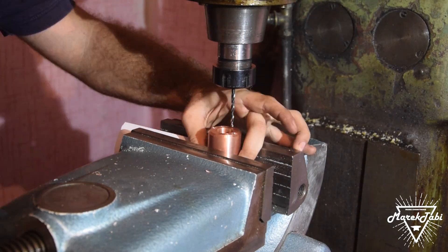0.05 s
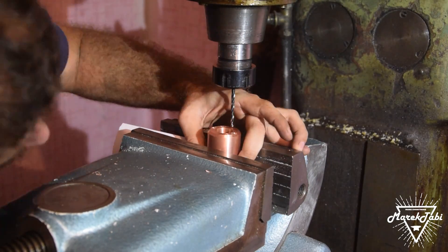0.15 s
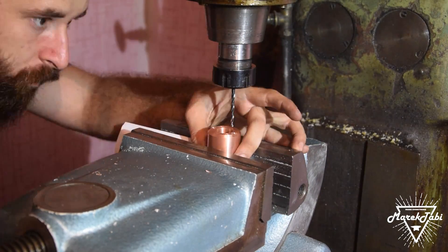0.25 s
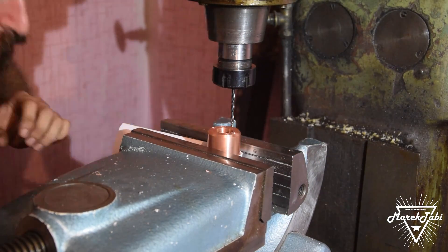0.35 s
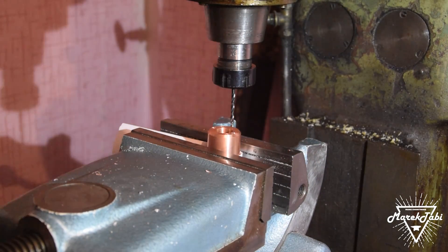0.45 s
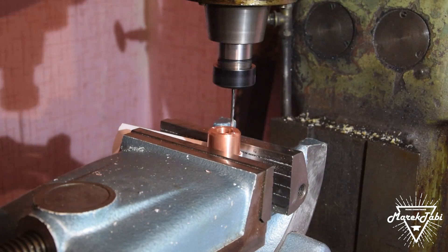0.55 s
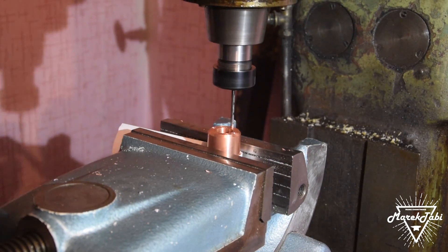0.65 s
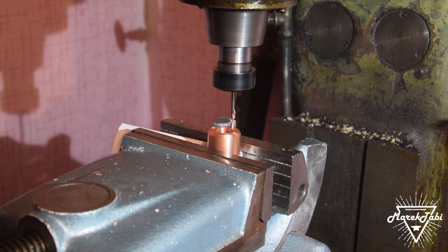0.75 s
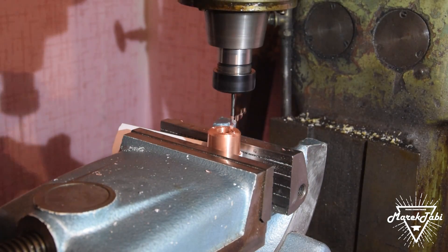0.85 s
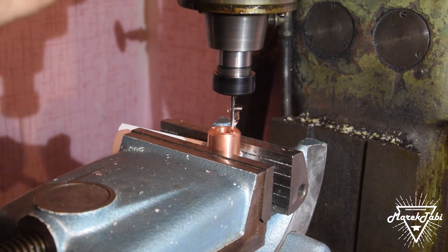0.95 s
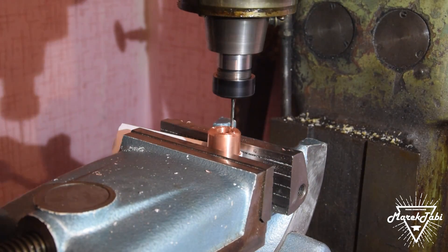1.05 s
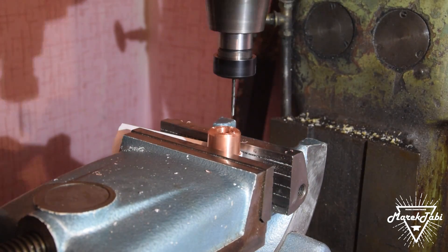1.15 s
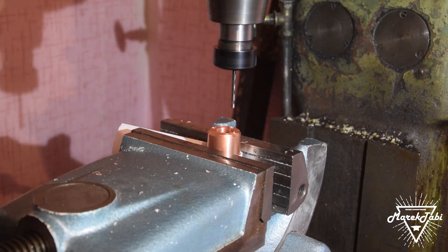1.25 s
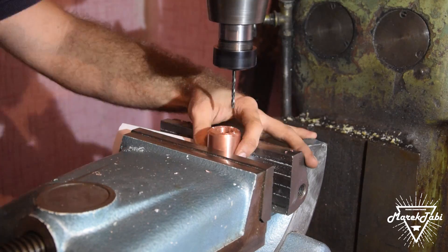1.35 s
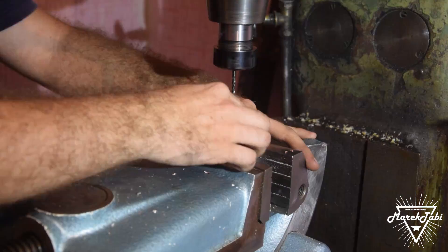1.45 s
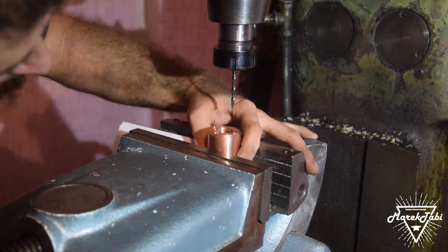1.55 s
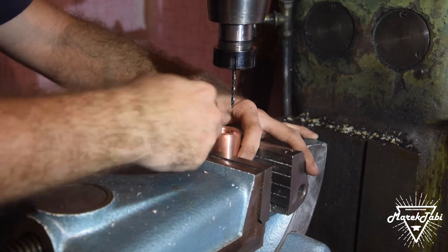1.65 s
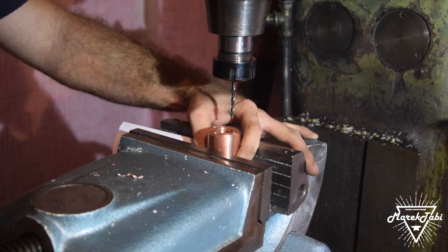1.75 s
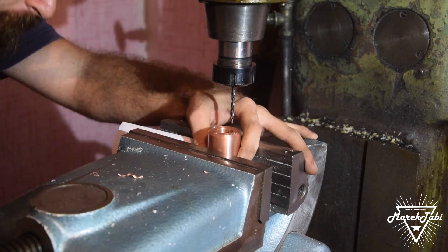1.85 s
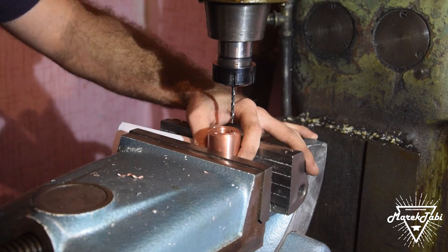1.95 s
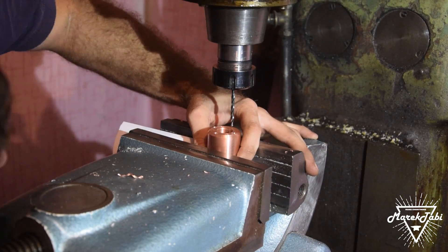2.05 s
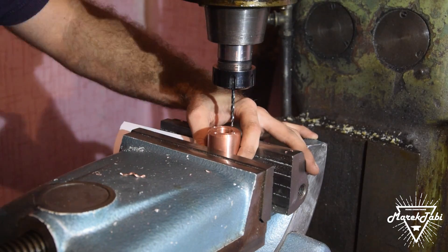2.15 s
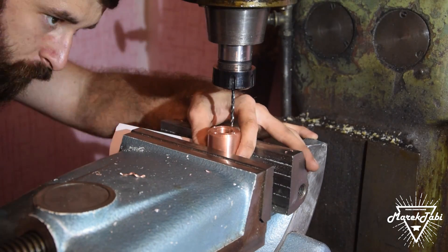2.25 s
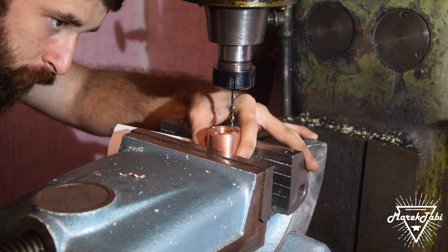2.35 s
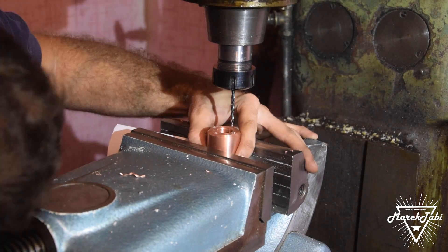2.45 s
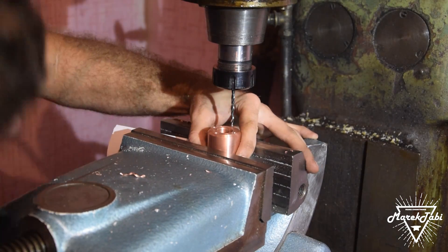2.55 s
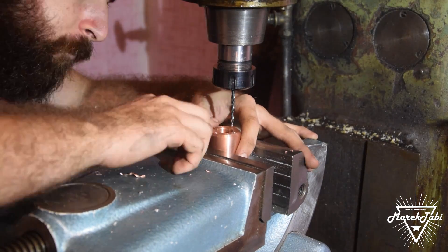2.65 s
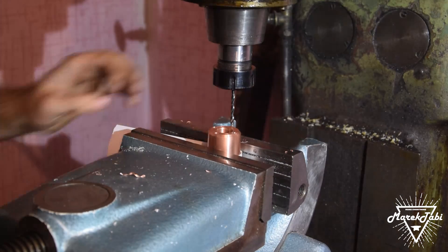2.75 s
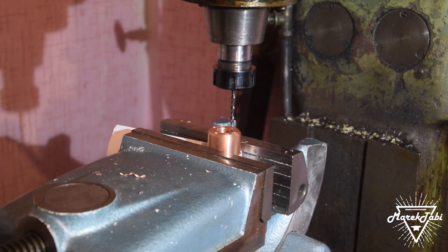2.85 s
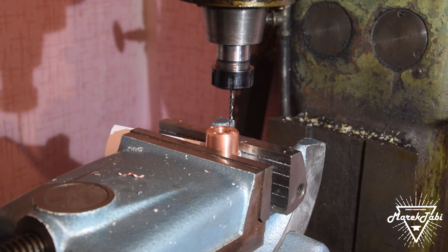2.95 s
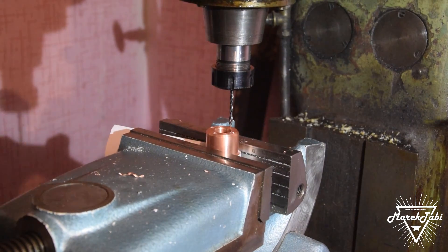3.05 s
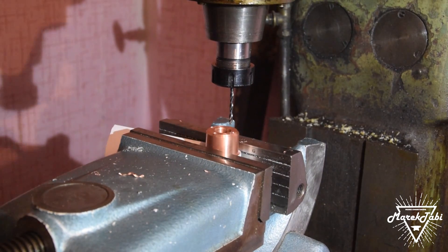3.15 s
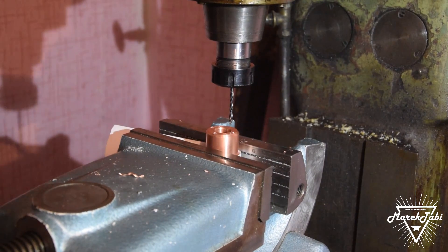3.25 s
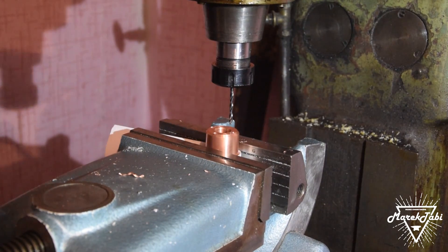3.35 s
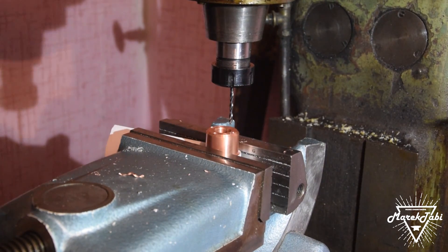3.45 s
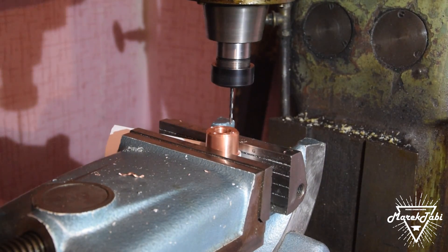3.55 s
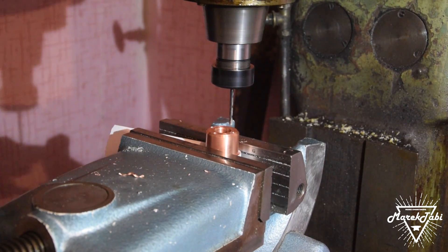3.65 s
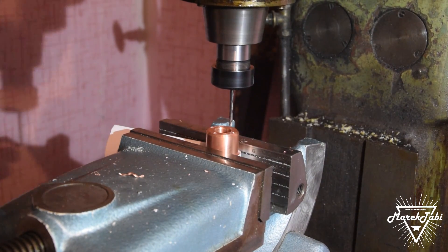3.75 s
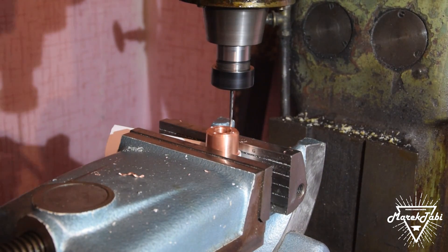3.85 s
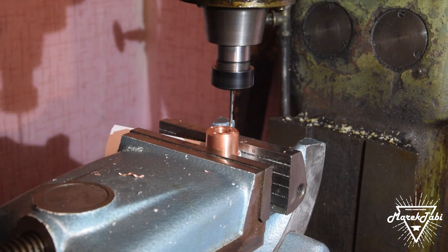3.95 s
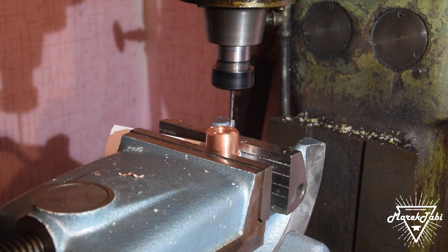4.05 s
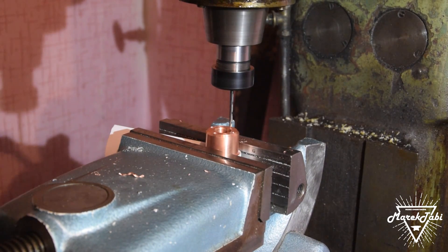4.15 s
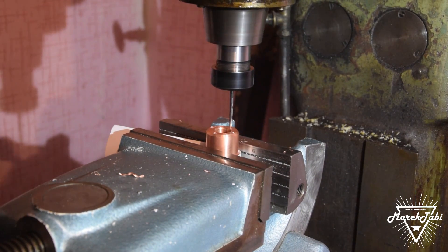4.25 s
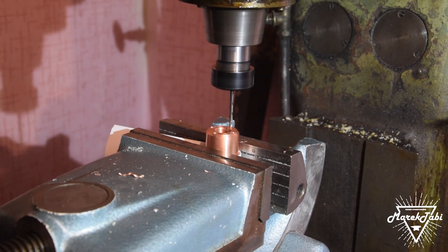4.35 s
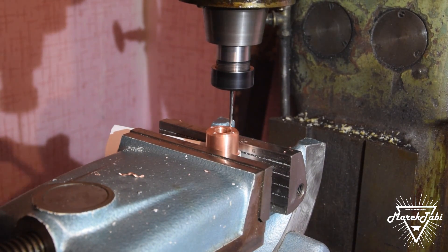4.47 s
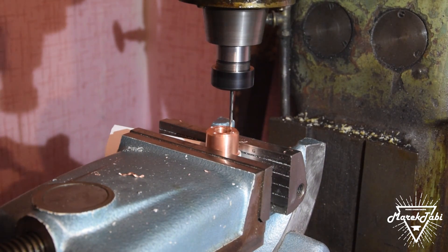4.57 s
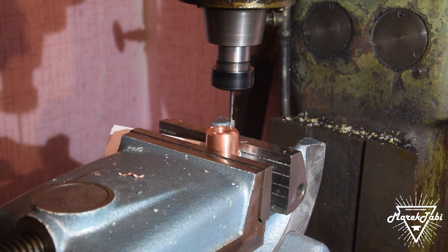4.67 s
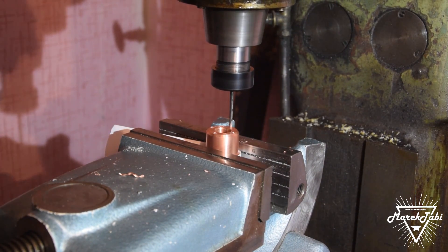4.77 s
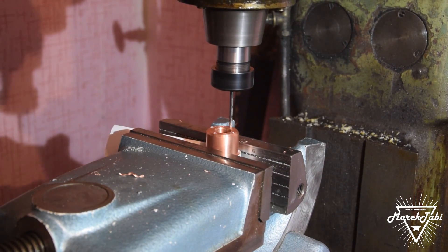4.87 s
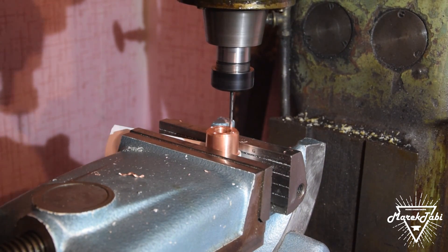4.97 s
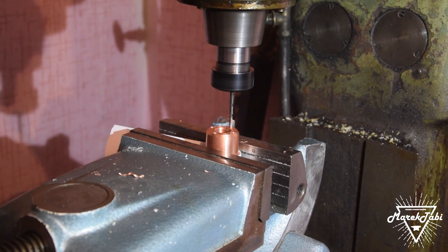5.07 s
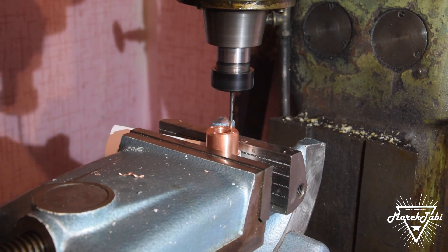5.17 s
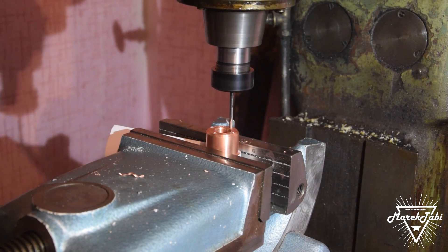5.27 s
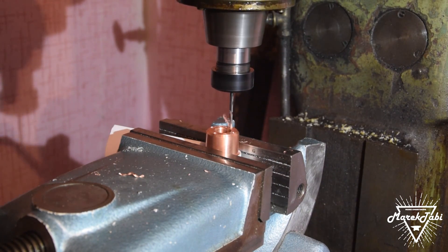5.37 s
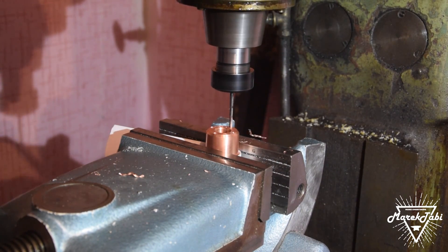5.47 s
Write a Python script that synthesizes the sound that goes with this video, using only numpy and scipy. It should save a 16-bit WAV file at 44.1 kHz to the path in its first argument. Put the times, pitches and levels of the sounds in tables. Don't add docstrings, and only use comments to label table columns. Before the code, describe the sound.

In a workshop, a milling machine is first heard in time-lapse: thin high whine, small knocks, a shrill rattling roar lasting under a second, then idle whine again. Abruptly the pitch drops to normal speed, the motor idling quietly. A lever clicks, the clutch bites with a heavy clunk, and the geared head roars steadily while a small drill hisses into copper. Close, mono, fairly dry small microphone.

```python
import sys
import numpy as np
from scipy import signal
from scipy.fft import rfft, irfft, next_fast_len
from scipy.io import wavfile
from scipy.ndimage import map_coordinates

SR = 44100
rng = np.random.default_rng(int(sys.argv[2]) if len(sys.argv) > 2 else 0)


def nominal_scale(level):
    x = np.asarray(level, float) / 20
    return 10 ** x


def int16_out(signal):
    q = np.round(np.clip(np.atleast_2d(signal).T, -1, 1) * 32767)
    wavfile.write(sys.argv[1], SR, q.astype(np.int16))


N = 242991

TRUE, SPEEDUP = 1, 7.5
CUT = 2.949
TURN_HZ = 30.3
TOP_HZ = 15790
OPEN_S = 1.289
JOLT_DB = 4.5
PULLS = [
    .591,
    3.487,
]


def unit(x):
    return x / np.sqrt(np.mean(x ** 2) + 1e-20)


def along(points, hz):
    f, v = np.transpose(points)
    return nominal_scale(np.interp(np.log(hz + 1), np.log(f + 1), v, left=-120))


def wobble(t, rate):
    u = (t - t[0]) * rate
    knots = rng.standard_normal(int(u[-1]) + 4)
    return map_coordinates(knots, [u], order=2)


def bump(t, s, wide):
    return np.exp(-((t - s) / wide) ** 2)


def slowed(lines):
    return [(hz / SPEEDUP, db) for hz, db in lines]


def coloured(x, gain, speed):
    m = next_fast_len(len(x) + 8192)
    f = np.fft.rfftfreq(m, speed / SR)
    return irfft(rfft(x, m) * gain(f), m)[:len(x)]


def rings(peaks, f):
    return np.sqrt(sum(nominal_scale(db) ** 2 / (1 + (2 * (f - c) / w) ** 2) ** 2 for c, w, db in peaks))


def tones(t, lines, speed, unsteady_db, rate=8):
    total = 0
    for hz, db in lines:
        if hz * speed < TOP_HZ:
            strength = nominal_scale(db + unsteady_db * wobble(t, rate * speed))
            total = total + strength * np.sin(2 * np.pi * (hz * speed * t + rng.random()))
    return np.sqrt(2) * total


def combs(rows, step_hz):
    return [(hz, db - loss * k) for first, last, db, loss in rows
            for k, hz in enumerate(np.arange(first, last + step_hz / 2, step_hz))]


def burst(t, s, db, rise, t60):
    since = np.clip(t - s, 0, None)
    return nominal_scale(db - 60 * since / t60) * (1 - np.exp(-since / rise)) * rng.standard_normal(len(t))


def started(t, speed, pull):
    bite_s, spin_up_s, drag_db = 0.098, 0.02, -15.5
    since = (t - pull) * speed
    turning = 1 - np.exp(-np.clip(since - bite_s, 0, None) / spin_up_s)
    drag = nominal_scale(drag_db) * np.clip(since / bite_s, 0, 1)
    jolt = bump(since, 0.165, 0.025)
    return turning, np.maximum(turning, drag), jolt


def clatter(t, speed, beat_db, rough_db):
    turn = 2 * np.pi * (TURN_HZ * speed * t + .015 * wobble(t, 3 * speed))
    beat = np.cos(turn) + 0.19 * np.cos(2 * turn + 0.52) + 0.14 * np.cos(3 * turn + 0.66)
    force = beat_db * beat + rough_db * np.tanh(wobble(t, 300 * speed)) + 0.47 * wobble(t, 6 * speed)
    return rng.standard_normal(len(t)) * nominal_scale(force)


def head(t, speed):
    # pitch in Hz, width in Hz, level in dB.
    casting_rings = [(115.5, 29, -32), (214, 55, -35), (280, 73, -33.5), (346, 16, -29.5), (414, 65, -25.5),
                     (514, 99, -25.5), (600, 55, -12), (682.6, 19.4, -8.5), (742, 73, -14), (811, 44, -6.5),
                     (923, 124, -10), (1080, 106, -6.5), (1161.4, 57, 1.14), (1280, 50, -9),
                     (1355, 75, -9.5), (1421, 77, -7.5), (1554, 120, -14), (1667, 18, -2.5),
                     (1610, 29, -12), (1683.5, 11, -6.5), (1690, 92, -16), (1769, 110, -7.5),
                     (1820, 32, -30), (1890, 22, -17), (1918, 25, -9), (1969, 130, -7), (2070, 27.8, -4.5),
                     (2060, 44, -12)]
    # pitch in Hz, width in Hz, level in dB.
    upper_rings = [(2520, 20, 0), (3380, 4.1, 8.5), (4160, 25, 2), (5600, 39, -5), (6700, 62, -5),
                   (7030, 41, -6), (8010, 170, -11.5), (8600, 29, -17)]
    # frequency in Hz, level in dB per Hz.
    roar = [(1260, -46), (2150, 1), (3560, -0.5), (4100, 0.5), (7510, -10.5), (9830, -16), (12900, -18),
            (15100, -21), (16000, -32)]

    def casting(f):
        ringing = np.hypot(rings(casting_rings, f), nominal_scale(-7.5) * rings(upper_rings, f))
        return np.hypot(ringing, nominal_scale(-13.0) * along(roar, f))

    def gap(f):
        return f ** 2 / (f ** 2 + 90 ** 2) * (1 - 0.69 * rings([(165, 24, 0)], f))

    teeth = clatter(t, speed, beat_db=1.1, rough_db=2.4)
    return unit(coloured(teeth, lambda f: casting(f) * gap(f), speed))


def loose_gears(t):
    # frequency in Hz, level in dB per Hz.
    rattle = [(350, -72), (600, -48), (822, -19), (997, -22), (1130, -47), (1550, -20), (1750, -26),
              (3520, -17.5), (4570, 2), (5460, -9), (6260, -2), (7380, -9), (8580, -1), (15900, -8)]
    teeth = clatter(t, SPEEDUP, beat_db=3.0, rough_db=4.0)
    return unit(coloured(teeth, lambda f: along(rattle, f), TRUE))


def orders(t, speed):
    # pitch in Hz, level in dB rms.
    spindle_tones = [(683.7, -83), (909.8, -67), (1141, -79), (1593, -67), (1825, -79), (1890, -75),
                     (2051, -81), (2638, -63), (2961, -67), (3284, -72), (3542, -73), (3768, -70),
                     (3822, -68), (3978, -71), (4102, -63), (4328, -55), (4447, -56), (4554, -55)]
    # pitch in Hz, level in dB rms.
    tooth_tones = [(5012, -54.5), (5905, -48.5), (10164, -47.5), (12635, -62), (15477, -48.5)]
    low = tones(t, slowed(spindle_tones), speed, unsteady_db=.7)
    return low + tones(t, slowed(tooth_tones), speed, unsteady_db=2.2, rate=14)


def coast(t):
    start_hz, sink_hz_per_s, level_db, rise_s, t60_s = 5100, 15500, -46, .012, .16
    since = np.clip(t - OPEN_S, 0, None)
    phase = 2 * np.pi * np.cumsum(np.clip(start_hz - sink_hz_per_s * since, 100, None)) / SR
    rough = wobble(t, 164) * np.sin(phase) + wobble(t, 140) * np.cos(phase)
    return nominal_scale(level_db - 60 * since / t60_s) * (1 - np.exp(-since / rise_s)) ** 2 * rough


def clutch(t, speed, pull):
    # seconds after the pull, level in dB, rise in seconds, time to fall 60 dB in seconds.
    blows = [
        (0, -32, 0.00081, 0.21),
        (.152, -19, 0.009, 0.17),
    ]
    # frequency in Hz, level in dB per Hz.
    steel = [(300, -52), (600, 3.5), (1500, 1), (3500, -1), (6000, -17), (10000, -26), (15000, -24)]
    shake = sum(burst(t, pull + s / speed, db, rise / speed, t60 / speed) for s, db, rise, t60 in blows)
    return nominal_scale(5.0) * coloured(shake, lambda f: along(steel, f), speed)


def cutting_hiss(t):
    # frequency in Hz, level in dB per Hz.
    chips = [(3000, -22), (6000, -23), (9500, 4), (12500, -15), (14000, -6), (15300, 1.5), (17000, -2)]
    # time in seconds, dB over the hiss.
    snaps = [
        (4.314, 6),
        (4.8, 2),
        (4.982, 1),
        (5.13, 7.5),
        (5.178, 5),
    ]
    level_db, rise_db_per_s, snatch_db = -44.5, 3.5, 17
    late_s, snap_s = .015, .012
    jolt = started(t, TRUE, PULLS[1])[2]
    turning = started(t - late_s, TRUE, PULLS[1])[0]
    snaps_db = sum(db * bump(t, s, snap_s) for s, db in snaps)
    cut = turning * nominal_scale(level_db + rise_db_per_s * (t - PULLS[1]) + snaps_db + snatch_db * jolt ** 2)
    lips = clatter(t, TRUE, beat_db=1.7, rough_db=2.2) * nominal_scale(1.2 * wobble(t, 14))
    return cut * unit(coloured(lips, lambda f: along(chips, f), TRUE))


def drill_sleeve(t):
    # pitch in Hz, width in Hz, level in dB.
    sleeve_rings = [(1090, 44, -5), (1143, 43, -5.5), (1186, 34, -1.5)]
    swell_at_s, swell_every_s, swell_depth_db = 4.315, 0.272, 6.5
    level_db, peak_s, fall_db, rest_db = -23.5, 4.32, 37, -11
    push = np.cos(2 * np.pi * (t - swell_at_s) / swell_every_s) - 1
    arch_db = np.maximum(-fall_db * (t - peak_s) ** 2, rest_db)
    turning = started(t, TRUE, PULLS[1])[0]
    load = turning * nominal_scale(level_db + arch_db + swell_depth_db * push)
    shake = clatter(t, TRUE, beat_db=1.5, rough_db=3.0)
    return nominal_scale(-4.0) * load * unit(coloured(shake, lambda f: rings(sleeve_rings, f), TRUE))


def motor(t, speed, air_db):
    # pitch in Hz, level in dB
    single_tones = [(538.3, -88), (780.6, -95), (834.4, -87), (877.5, -91), (974.4, -92), (1270, -98), (1470, -93),
                    (1567, -69), (1615, -79), (1663, -80), (1760, -84), (1895, -74), (1927, -89), (1954, -86),
                    (2056, -88), (2159, -84), (2250, -95), (2347, -93), (2406, -91), (2546, -87),
                    (2697, -86), (3031, -79), (3230, -82), (3483, -87), (3515, -86), (3623, -78), (3709, -74),
                  (3768, -76), (3795, -75), (3854, -83), (4210, -78), (4274, -79), (4317, -73), (4560, -75),
                  (4732, -79), (5087, -80), (5270, -81), (5389, -79),
                    (6907, -73), (7224, -69), (7876, -67), (8183, -63), (8533, -66), (11041, -76),
                  (11246, -68), (12597, -67), (13194, -73), (15520, -73), (15649, -76)]
    # first Hz, last Hz, level in dB rms, dB lost a step.
    whine_combs = [(5889, 6428, -76, -5), (6476, 7014, -52, 9), (7763, 10455, -60, 2.5),
                   (10169, 10707, -61, -1), (11784, 12322, -54, 8), (13114, 15267, -63, 1.3)]
    # first Hz, last Hz, level in dB rms, dB lost a step.
    slot_combs = [(2288, 3074, -61, 0), (2514, 2514, -62, 0), (2611, 4183, -61, .5), (2681, 3467, -54, 9),
                  (2751, 5109, -62, 1), (3714, 6072, -66, -2), (3790, 5362, -65, 0), (4107, 5679, -63, 0),
                  (5432, 6218, -61, 2), (5825, 5825, -58, 0), (6395, 6395, -65, 0)]
    # pitch in Hz, width in Hz, level in dB.
    casing_rings = [(74.7, 6.8, -47), (117.5, 22, -34.5), (214.6, 8.3, -20.5), (263, 155, -30),
                    (390, 66, -19.5), (506, 59, -18), (596, 59, -10), (690, 94, -15.5), (814, 57, -18),
                    (885, 13, -16.5), (938, 77, -11), (1020, 11.5, 0.5), (1067, 20, 1), (1136, 110, -2.5),
                    (1290, 45, -5), (1380, 45, -2.5), (1430, 60, -14.5), (1518, 60, -8),
                    (1571.0, 4.4, -12.5), (1730, 26, -1.5), (1673, 58.4, -2), (1790, 43.7, -12),
                    (1700, 17.1, -12.5), (1945, 148.4, -8.5), (2020, 13, -16.5), (2095, 170, -9)]
    # frequency in Hz, level in dB per Hz.
    fan = [(1260, -43), (2150, -14), (2670, -2), (2880, -7.5), (4170, -11), (4540, -10.5), (5990, -2),
           (7640, -21.5), (7970, -19), (9830, -22.5), (10800, -13.5), (12800, -19), (13900, -22),
           (16000, -20)]
    shaft_hz, slot_hz = 538.3, 786

    def casing(f):
        return np.hypot(rings(casing_rings, f), nominal_scale(-7.5) * along(fan, f))

    sped_up = single_tones + combs(whine_combs, shaft_hz)
    whine = nominal_scale(1.0) * tones(t, slowed(sped_up), speed, unsteady_db=1.0)
    slots = tones(t, combs(slot_combs, slot_hz), speed, unsteady_db=2.2, rate=25)
    unsteady = nominal_scale(0.45 * wobble(t, 40 * speed) + 1.0 * wobble(t, 3.6 * speed))
    air = unit(coloured(rng.standard_normal(len(t)) * unsteady, casing, speed))
    return whine + slots + nominal_scale(air_db) * air


def knocks(t):
    # time in seconds, level in dB, pitch in Hz, width in Hz, time to fall 60 dB in seconds; sped up.
    blows_on_table = [(.612, -60, 950, 200, 0.038), (1.062, -47, 890, 150, 0.032),
                      (1.30, -66, 890, 250, 0.63), (1.54, -51, 3330, 500, 0.031),
                      (1.80, -69, 840, 302, .05), (2.018, -47, 5400, 900, 0.022),
                      (2.657, -58, 880, 250, 0.043), (2.671, -66, 900, 600, .03),
                      (2.822, -58, 3000, 2500, 0.023), (2.902, -62, 800, 300, .05),
                      (2.915, -63, 850, 400, 0.42)]
    total = 0
    for s, db, hz, w, t60 in blows_on_table:
        blow = burst(t, s, db, 0.0021, t60)
        total = total + coloured(blow, lambda f: rings([(hz, w, 0)], f) * np.sqrt(SR / w / 2), TRUE)
    return total


def microphone(x, speed):
    return coloured(x, lambda f: f ** 6 / (f ** 6 + 60 ** 6) + .002, speed)


def time_lapse(t):
    # time in seconds, level in dB over the run.
    clacks = [
        (.614, 3),
        (.785, 5),
        (.91, 2),
        (1.055, 3),
        (1.125, 1),
        (1.295, 2),
    ]
    late_s, clack_s = .003, .004
    run_start_db, warm_db, warm_s = -28, -2.5, 0.061
    let_go_s, run_down_db_per_s = 0.015, 96
    turning, speed_up, jolt = started(t - late_s, SPEEDUP, PULLS[0])
    since_pull = np.clip(t - PULLS[0], 0, None)
    since_open = np.clip(t - OPEN_S, 0, None)
    run_db = run_start_db + warm_db * np.exp(-since_pull / warm_s) + 1.05 * JOLT_DB * jolt
    run_db = run_db - run_down_db_per_s * since_open
    clacks_db = sum(db * bump(t, s, clack_s) for s, db in clacks)
    run = speed_up * nominal_scale(run_db + clacks_db)
    held = np.exp(-since_open / let_go_s * 2)
    freed = 1 - held
    gears = (1 - 0.49 * freed) * head(t, SPEEDUP) + 0.61 * freed * loose_gears(t)
    spindle = run * gears + turning * held * orders(t, SPEEDUP)
    spindle = spindle + nominal_scale(-11) * clutch(t, SPEEDUP, PULLS[0]) + coast(t)
    return microphone(spindle + motor(t, SPEEDUP, air_db=-46.0) + knocks(t), SPEEDUP)


def true_speed(t):
    level_db, deeper_db_per_s = -27.5, 0.94
    lock_s = .07
    _, speed_up, jolt = started(t, TRUE, PULLS[1])
    run = speed_up * nominal_scale(level_db + deeper_db_per_s * (t - PULLS[1]) + JOLT_DB * jolt)
    locked = started(t - lock_s, TRUE, PULLS[1])[0]
    gears = nominal_scale(-0.5) * head(t, TRUE) + nominal_scale(26.5) * locked * orders(t, TRUE)
    spindle = run * gears + clutch(t, TRUE, PULLS[1])
    drill = cutting_hiss(t) + drill_sleeve(t)
    return microphone(spindle + drill + motor(t, TRUE, air_db=-42.0), TRUE)


def scene():
    t = np.arange(N) / SR
    return np.concatenate([time_lapse(t[t < CUT]), true_speed(t[t >= CUT])])[None]


def roll_off(x):
    return signal.sosfilt(signal.butter(12, 16900, fs=SR, output="sos"), x)


def record(dry):
    limited = coloured(dry[0], lambda f: np.clip((TOP_HZ - f) / 90, 0, 1), TRUE)
    return roll_off(limited[None])


dry = scene()
out = record(dry)
int16_out(out)
```